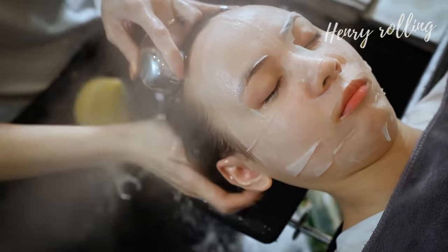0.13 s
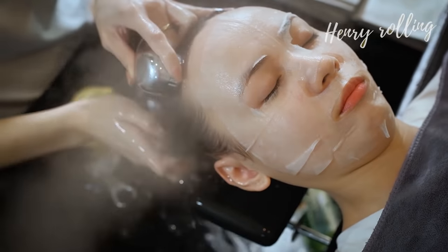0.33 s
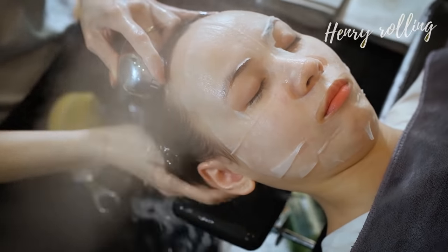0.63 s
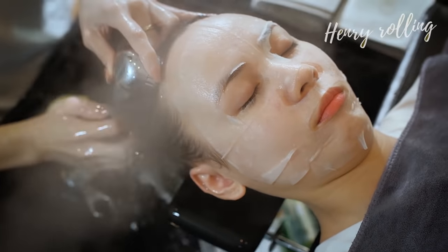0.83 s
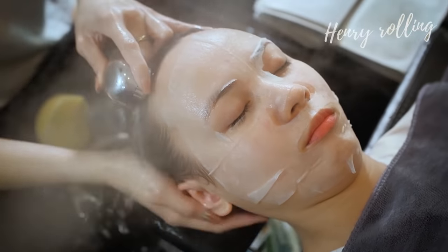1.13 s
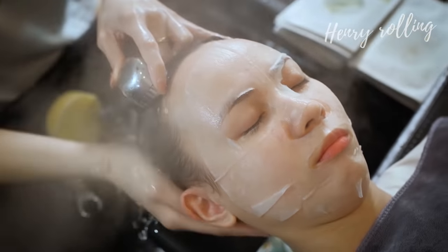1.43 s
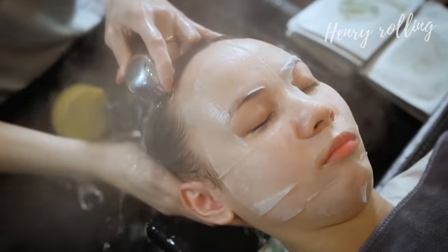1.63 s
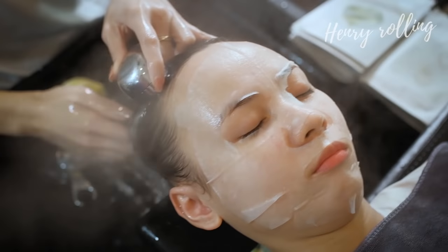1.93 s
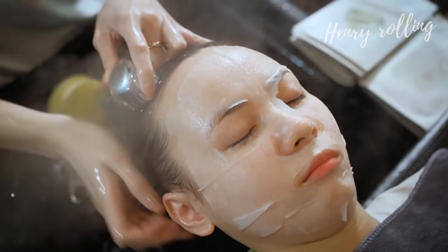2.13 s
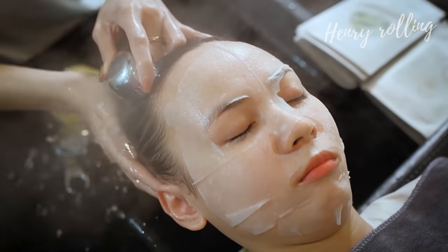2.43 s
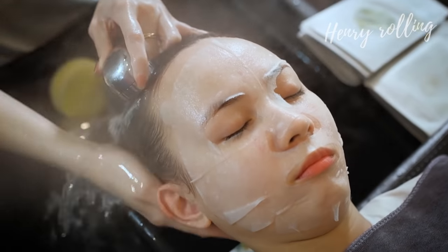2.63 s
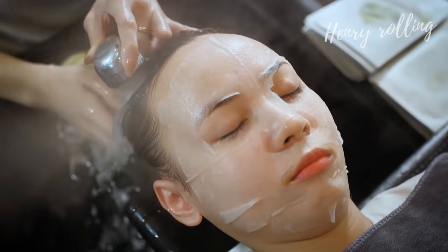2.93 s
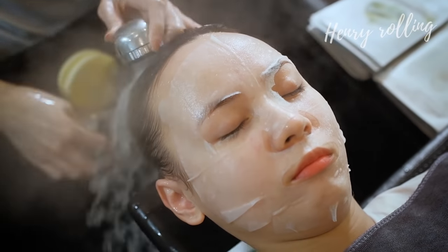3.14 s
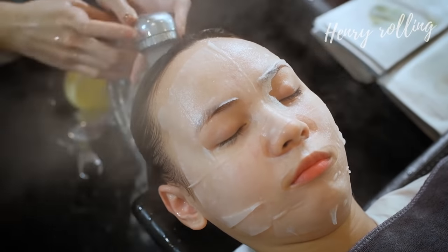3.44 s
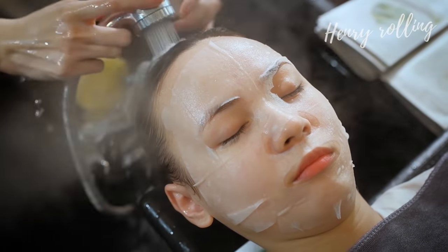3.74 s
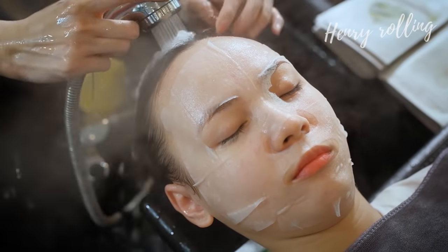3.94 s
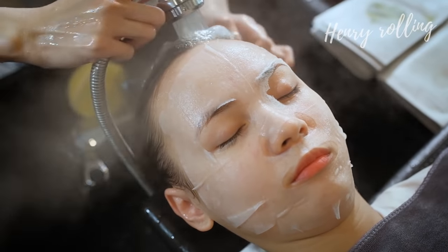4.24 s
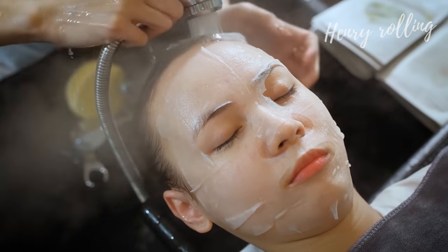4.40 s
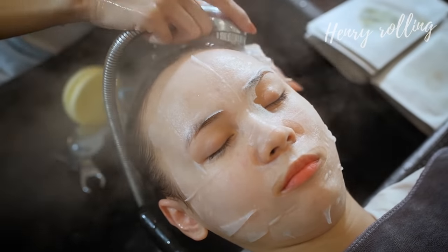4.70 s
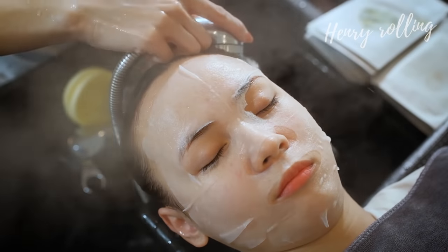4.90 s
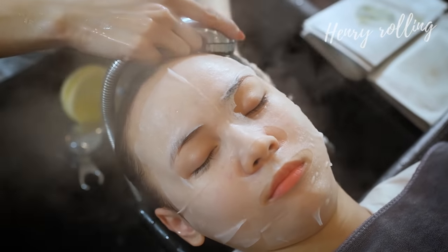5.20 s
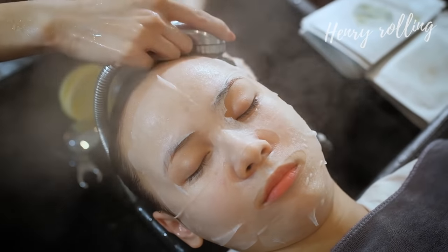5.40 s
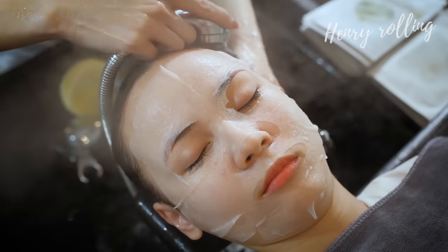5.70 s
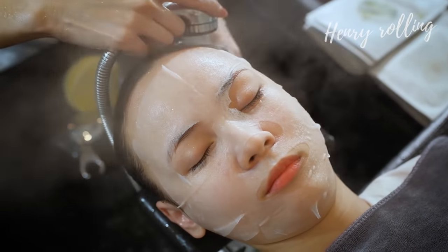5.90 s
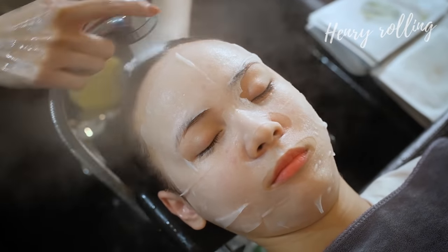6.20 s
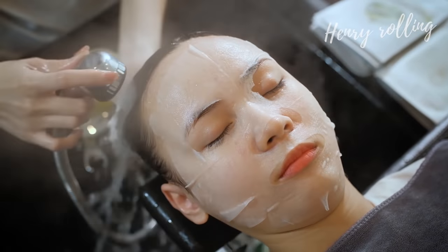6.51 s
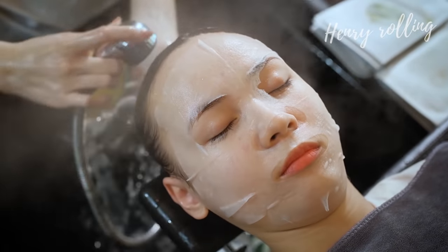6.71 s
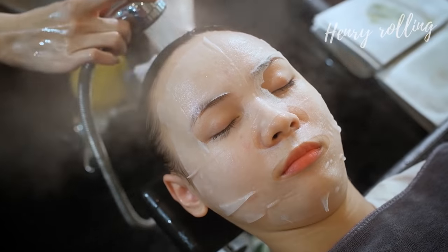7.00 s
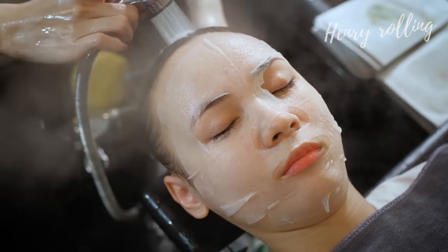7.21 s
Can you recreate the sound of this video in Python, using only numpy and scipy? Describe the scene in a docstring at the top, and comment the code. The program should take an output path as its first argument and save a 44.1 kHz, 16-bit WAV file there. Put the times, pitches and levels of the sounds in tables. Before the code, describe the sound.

Close hair rinsing at a salon basin: run-off drumming, hand splashes, big drops and gurgles, then strong surging shower spray.

```python
"""The jets of a hand shower hiss on hair and skin as shaped noise, louder as the head lifts away.
Below them running water excites the resonances of a hollow ceramic basin: the bowl drums, the hollow hums.
Loose water sloshes as swells of noise; drops patter as noise bursts and damped bubble tones.
Air trapped under a cupped hand gurgles as rough tones of rising pitch. A two-port microphone is near."""
import sys
import numpy as np
from scipy import signal
from scipy.fft import rfft, irfft, next_fast_len
from scipy.io import wavfile
from scipy.ndimage import uniform_filter1d, map_coordinates

SR = 44100
rng = np.random.default_rng(int(sys.argv[2]) if len(sys.argv) > 2 else 0)


def linear_from_db(decibels):
    """Turn decibels (scalar or array-like) into linear amplitude factors; 0 gives 1."""
    return 10 ** (np.asarray(decibels, float) / 20)


def store_pcm(level_fs):
    """Save levels as 16-bit WAV."""
    pcm = np.round(np.clip(level_fs, -1, 1) * 32767).astype(np.int16)
    wavfile.write(sys.argv[1], SR, np.atleast_2d(pcm).T)


N = 324135  # samples in the scene


def unit(x):
    """Normalization: x scaled to rms 1."""
    return x / np.sqrt(np.mean(x ** 2) + 1e-20)


def along(points, hz):
    """Interpolation of (Hz, value) points on a logarithmic frequency axis."""
    f, value = np.transpose(points)
    return np.interp(np.log(hz + 1), np.log(f + 1), value)


def curves(rows):
    """Linear interpolation in time: one value per sample for each column after the seconds."""
    s, *columns = np.transpose(rows)
    return [np.interp(np.arange(N) / SR, s, column) for column in columns]


def wobble(rate):
    """Random modulation: a smooth curve through random knots, rate knots a second."""
    return map_coordinates(rng.standard_normal(N // 100), [np.arange(N) * rate / SR])


def swollen(steady_db, s, length, db, rise_s):
    """Addition of powers: a steady level plus swells that rise quickly and die away over their length."""
    t = np.arange(0, N + 64, 64) / SR
    since = np.clip(t - s[:, None], 0, None)
    shape = (1 - np.exp(-since / rise_s)) * np.exp(-(since / length[:, None]) ** 2)
    power = np.sum((linear_from_db(db)[:, None] * shape) ** 2, 0)
    swells = np.interp(np.arange(N) / SR, t, power)
    return 10 * np.log10(linear_from_db(steady_db) ** 2 + swells)


def filtered(x, response):
    """Linear filtering: the spectrum of x times a complex response of frequency."""
    m = next_fast_len(N + SR // 2)
    return irfft(rfft(x, m) * response(np.fft.rfftfreq(m, 1 / SR)), m)[..., :N]


def noise(patchy_db):
    """Turbulence: two unrelated white noises sharing patches of random gain in time and frequency."""
    z = signal.stft(rng.standard_normal((2, N)), nperseg=512)[2]
    field = uniform_filter1d(rng.standard_normal(z.shape[1:]), size=7, axis=0)
    field = uniform_filter1d(field, size=6, axis=1)
    return signal.istft(z * linear_from_db(patchy_db * unit(field)), nperseg=512)[1][:, :N]


def coloured(x, spectrum):
    """Spectral shaping: x filtered to a spectrum, at rms 1."""
    return unit(filtered(x, lambda hz: linear_from_db(along(spectrum, hz))))


def resonant(x, modes, between_db):
    """Modal resonance: x through a set of resonances, with a little sound between them, at rms 1."""
    def response(f):
        peaks = sum(linear_from_db(db) ** 2 / (1 + (2 * (f - c) / w) ** 2) ** 2 for c, w, db in modes)
        span = (f > modes[0][0]) & (f < modes[-1][0])
        return np.sqrt(peaks + span * linear_from_db(between_db) ** 2)
    return unit(filtered(x, response))


def bubbles(s, hz, db, cycles, rise):
    """Bubble resonance: damped tones with a soft start, rising in pitch as each bubble nears the surface."""
    t = np.arange(SR // 60) / SR
    u = t * (hz / cycles)[:, None]
    tone = np.sin(2 * np.pi * hz[:, None] * t * (1 + rise * u)) * u * np.exp(1 - u)
    at = np.round(s * SR).astype(int)[:, None] + np.arange(len(t))
    return np.bincount(at.ravel(), (linear_from_db(db)[:, None] * tone).ravel(), N + SR)[:N]


def bursts(s, db, life_s):
    """Impact noise: puffs of white noise with a quick rise and an exponential fall."""
    u = np.arange(SR // 60) / SR / life_s[:, None]
    at = np.round(s * SR).astype(int)[:, None] + np.arange(u.shape[1])
    shape = np.bincount(at.ravel(), (linear_from_db(db)[:, None] * u * np.exp(1 - u)).ravel(), N + SR)[:N]
    return shape * rng.standard_normal(N)


# Run-off into the bowl, less once the head moves over the crown.
# Each row: time in seconds, drumming level in dB.
RUNOFF_LEVEL = [(0, -38), (1.0, -35), (2.2, -35), (3.2, -33), (4.2, -35), (5.9, -36.5), (6.7, -34.5),
                (7.35, -37.5)]
# Lumps of run-off thumping the bowl. Each row: start in seconds, fall in seconds, level before shaping in dB.
THUMP_SWELLS = [(0.13, 0.25, -30.5), (0.596, 0.09, -25), (0.803, 0.083, -28.5), (1.12, 0.12, -32),
                (1.975, 0.38, -32.5), (2.6, 0.088, -33), (2.844, .1, -28), (3.28, 0.1, -24),
                (3.597, 0.075, -26.5), (3.953, .1, -29.5), (6.566, 0.065, -25.5)]


def drumming():
    """Impact excitation: level in dB of the run-off on the bowl, thumps included."""
    return swollen(curves(RUNOFF_LEVEL)[0], *np.transpose(THUMP_SWELLS), rise_s=0.02)


# Resonances of the bowl. Each row: frequency in Hz, 6 dB width in Hz, relative level in dB.
BOWL_MODES = [(194.7, 16, -14.5), (248.7, 11, -0.5), (288, 43, 2), (349.8, 26, 1), (418.4, 68, -4.5)]


def bowl():
    """Modal resonance: lumpy run-off drives the modes of the bowl."""
    level_db = drumming() + 0.54 * wobble(8.3)
    return linear_from_db(level_db) * resonant(noise(patchy_db=1.5), BOWL_MODES, between_db=-15)


# Spectrum of the rumble. Each row: frequency in Hz, relative density in dB per Hz.
RUMBLE_SPECTRUM = [(20, -3), (70, -2), (120, 10), (150, -5), (185, 22), (205, -24)]


def rumble():
    """Amplitude modulation: the level of a faint bass noise follows the drumming."""
    level_db = -75 + 0.92 * (drumming() + 34) + 2.4 * wobble(8.6)
    return linear_from_db(level_db) * coloured(noise(patchy_db=3), RUMBLE_SPECTRUM)


# The stream in the hollow. Each row: time in seconds, hum level in dB.
HUM_LEVEL = [(0, -27.5), (2.4, -27.5), (3.6, -26), (4.9, -29), (6.2, -26.5), (7.35, -26.5)]
# Resonances of air in basin and drain. Each row: frequency in Hz, 6 dB width in Hz, relative level in dB.
HOLLOW_MODES = [(515, 26, -17.5), (587.6, 31, -9), (640.3, 42.4, -9.5), (900, 25, -6), (967, 66.4, 1.5),
                (1030, 29, 2), (1102, 109, -3), (1540, 110, -7.5), (1658, 51, -6), (1758, 110, -10),
                (2132, 190, -17.5), (2400, 200, -21)]


def hollow():
    """Cavity resonance: the steady stream makes the air in basin and drain hum."""
    level_db = curves(HUM_LEVEL)[0] + 0.6 * wobble(4.6)
    return linear_from_db(level_db) * resonant(noise(patchy_db=1.0), HOLLOW_MODES, between_db=-49.0)


# Swells of low and of high sloshing.
# Each row: start in seconds, fall in seconds, level before shaping in dB.
LOW_SLOSH_SWELLS = [(0.0, 0.096, -34), (0.2, 0.38, -36.5), (0.63, 0.077, -33), (0.8, .35, -44),
                    (1.42, .08, -40), (1.606, 0.24, -39.5), (2.17, 0.54, -45), (2.5, 0.82, -47.5),
                    (3.245, 0.075, -28), (3.5, 0.09, -30), (3.697, .25, -39), (4.0, .12, -31.5),
                    (4.25, .2, -37), (4.542, 0.084, -34), (5.058, 0.084, -36), (5.5, .15, -35),
                    (6.017, 0.18, -36), (6.447, 0.44, -39.5), (7.303, .1, -31)]
HIGH_SLOSH_SWELLS = [(0.2, 0.37, -43), (0.78, 0.19, -32), (1.15, .15, -39), (1.6, .3, -48), (2.1, .1, -34),
                     (2.48, 0.082, -32), (3.7, .3, -38), (4.0, 0.5, -28), (4.7, 0.54, -31.5),
                     (5.5, 0.6, -39), (6.3, 0.34, -37), (6.85, 0.13, -23), (6.98, 0.14, -24.5),
                     (7.26, .15, -33)]
# Spectra of low and of high sloshing. Each row: frequency in Hz, relative density in dB per Hz.
LOW_SLOSH_SPECTRUM = [(420, -50), (480, 1), (700, 7), (860, 8), (950, -44)]
HIGH_SLOSH_SPECTRUM = [(1100, -45), (1250, -6), (1450, 4), (2000, -1.5), (2600, -6.5), (2750, -46)]


def slosh():
    """Turbulent motion: loose water sloshes in the bowl in two bands, swelling over a quiet level."""
    rise_s = 0.037
    low_db = swollen(-66, *np.transpose(LOW_SLOSH_SWELLS), rise_s)
    high_db = swollen(-45.5, *np.transpose(HIGH_SLOSH_SWELLS), rise_s)
    low = linear_from_db(low_db) * coloured(noise(patchy_db=4.0), LOW_SLOSH_SPECTRUM)
    high = linear_from_db(high_db) * coloured(noise(patchy_db=1.5), HIGH_SLOSH_SPECTRUM)
    return low + high


# The steady jets, opening as the head lifts.
# Each row: time in seconds, hiss in dB, slap on skin in dB over hiss, mist in dB over hiss.
SPRAY_LEVELS = [(0, -44.5, -25, -18), (0.9, -39, -28, -20), (1.55, -34, -18, -22.5), (2.0, -41.5, -21, -18),
                (2.7, -38, -4, -25), (2.87, -30, 2, -24), (3.3, -23, -5.5, -15), (3.7, -23, -7, -15),
                (3.9, -20.5, -2.5, -13), (4.1, -21.5, -2.5, -17.5), (4.5, -16.5, -7.5, -18.5),
                (4.75, -20, -4, -24), (4.9, -23.5, -11, -24.5), (5.23, -18.5, -9.5, -23),
                (5.4, -26, -1, -25), (5.65, -21, -6.5, -22), (5.87, -16.5, -10.5, -20.5),
                (6.05, -18, -8, -18), (6.3, -23.5, -4.5, -23.5), (6.9, -26.5, -4.5, -21),
                (7.02, -21, -10, -21), (7.12, -22, -12.5, -21), (7.25, -17, -5.5, -18),
                (7.35, -18, -9, -18)]
# The hand passing through the jets. Each row: centre in seconds, 1/e half-length in seconds, depth in dB.
HAND_DIPS = [(4.78, .015, 4), (4.86, 0.049, 4.5), (5.049, 0.032, 4), (5.145, 0.053, 3), (5.477, 0.094, 7)]
# Water scooped or thrown off by the hand. Each row: start in seconds, fall in seconds,
# hiss before shaping in dB, slap in dB over hiss, mist in dB over hiss.
SPLASH_SWELLS = [(0.0, 0.058, -32, -3, -19), (0.16, 0.085, -36, 1.5, -14), (0.407, 0.13, -35.5, 0, -30),
                 (0.613, 0.084, -36.5, 2.5, -27), (0.749, 0.16, -35, 3, -11.5), (1.173, .09, -30, 1.5, -27),
                 (1.3, 0.072, -32.5, -1.5, -24), (1.51, 0.23, -32.5, -5, -27), (2.01, 0.091, -35, -28, -18),
                 (2.138, 0.076, -31.5, 0, -15), (2.23, 0.084, -32.5, -6, -16),
                 (2.326, 0.092, -37, 0.5, -23), (2.475, 0.086, -33.5, -1, -28),
                 (3.722, 0.11, -16.5, -5, -24), (3.75, .015, -24, 10, -20), (4.79, .015, -26, -18, -10),
                 (5.192, .02, -22, -10, -22), (5.38, .02, -26, 2, -18), (5.78, 0.1, -25.5, 3, -25),
                 (5.5, 0.11, -16.5, -7.5, -19), (6.5, 0.093, -28, 3.5, -25), (6.59, 0.024, -22, -2, -24)]


def spray():
    """Attenuation and addition of powers: jet levels dip under the hand and gain the splashes."""
    hiss_db, slap_db, mist_db = curves(SPRAY_LEVELS)
    t = np.arange(N) / SR
    dip_db = sum(depth_db * np.exp(-((t - s) / length) ** 2) for s, length, depth_db in HAND_DIPS)
    s, length, db, slap, mist = np.transpose(SPLASH_SWELLS)
    rise_s = 0.021
    hiss_level = swollen(hiss_db - dip_db, s, length, db, rise_s)
    slap_level = swollen(hiss_db + slap_db - dip_db, s, length, db + slap, rise_s)
    mist_level = swollen(hiss_db + mist_db - 0.84 * dip_db, s, length, db + mist, rise_s)
    return hiss_level, slap_level, mist_level


# Each row: frequency in Hz, relative density in dB per Hz.
HISS_SPECTRUM = [(2700, -120), (2950, -27), (3400, -11), (4200, 0), (5500, -0.5), (7000, -2), (8500, -12),
                 (9600, -17), (9800, -62)]
SLAP_SPECTRUM = [(900, -72), (1300, -8), (1900, -2), (2600, 3), (3300, 2), (4000, -1), (5000, -54)]
MIST_SPECTRUM = [(7000, -40), (9000, -1), (10000, -4.5), (12500, -7.5), (14500, -11.5), (15800, -19)]


def jets(hiss_db, slap_db, mist_db):
    """Jet noise: fine jets break on hair, splutter in all colours together and spit when choked."""
    # Under a hiss of -21.5 dB the spitting deepens with each dB lost
    choked = np.clip(0.24 * (-21.5 - hiss_db), 0, 1.5)
    splutter = 0.66 * wobble(12) + 0.75 * wobble(45)
    surge, spit = choked * wobble(30), choked * wobble(140)
    hiss_level = hiss_db + 0.62 * splutter + 0.54 * surge + 1.4 * spit
    hiss = linear_from_db(hiss_level) * coloured(noise(patchy_db=2.45), HISS_SPECTRUM)
    skin = noise(patchy_db=1.5)
    # The slap also rings the upper hollow; time reversal makes its noise differ from the slap's
    ringing = linear_from_db(-10.5) * resonant(skin[:, ::-1], HOLLOW_MODES[7:10], between_db=-30)
    slap_level = slap_db + 0.42 * splutter + 0.4 * surge
    slap = linear_from_db(slap_level) * (coloured(skin, SLAP_SPECTRUM) + ringing)
    mist_level = mist_db + 0.9 * splutter + 0.3 * surge + 2.2 * spit
    mist = linear_from_db(mist_level) * coloured(noise(patchy_db=1.5), MIST_SPECTRUM)
    return hiss + slap + mist


def patter(hiss_db, count=4200):
    """Random impacts: small drops from the hair tick, harder under stronger spray; a few are much bigger."""
    draw = rng.random((count, 5))
    s = draw[:, 0] * N / SR
    rare = -np.log(1 - 0.99 * draw[:, 1])  # exponential spread of force
    force_db = 0.43 * (hiss_db[(s * SR).astype(int)] + 34.5) + 4.14 * rare
    crack = bursts(s, force_db - 40.5, 0.00039 + 0.00097 * draw[:, 4])
    pitch_hz = 3400 * linear_from_db(6.73 * draw[:, 2])
    cycles = 1.3 + 4 * draw[:, 3] ** 3
    return crack + bubbles(s, pitch_hz, force_db - 42.5, cycles, rise=0.009)


# Single big drops. Each row: start in seconds, relative level in dB, pitch in Hz.
BIG_DROPS = [(0.138, -31, 4300), (0.168, -20, 4870), (0.1916, -2.5, 3890), (0.251, -19, 4300),
             (0.29, -16, 4280), (0.3053, -15.5, 5600), (0.408, -21, 6450), (0.4364, -14.5, 6430),
             (0.609, -11, 6180), (0.773, -11.5, 4500), (0.828, -9.5, 4880), (0.864, -14.5, 4700),
             (0.928, -13.5, 4870), (1.011, -13.5, 7840), (1.074, -15, 4050), (1.1237, -20, 4450),
             (1.1822, -12, 4500), (1.3197, -12, 3860), (1.3896, -17, 5840), (1.49, -9.5, 4540),
             (1.5725, -15, 3800), (1.647, -16, 5440), (1.8194, -11.5, 5000), (1.889, -9, 5370),
             (2.0407, -29, 4200), (2.081, -17, 7600), (2.111, -16.5, 7750), (2.14, -22, 5500),
             (2.279, -20.5, 4800), (2.3271, -11, 3950), (2.3412, -14.5, 4800), (2.351, -11, 3950),
             (2.491, -16, 6200), (2.5438, -16, 4270), (3.184, -9, 4850), (3.3004, -6.5, 4430),
             (3.4018, -17, 4870), (3.727, -3.5, 3100), (4.595, -5.5, 4950), (5.203, -12, 5200),
             (6.499, -6.5, 4000), (6.6008, -3.5, 4520), (6.6453, -5.5, 3730), (6.8417, -11, 4450)]


def drops():
    """Impact and bubble resonance: a big drop cracks, rings and throws a cluster of smaller ones after it."""
    s, db, hz = np.transpose(BIG_DROPS)
    sound = bubbles(s, hz, db - 3.5, cycles=3.5, rise=0.0076)
    sound += bursts(s, db - 5, np.full(len(s), 0.0013))
    for later in rng.random((4, len(s), 2)):
        spread_hz = np.clip(hz * linear_from_db(9.65 * (later[:, 1] - 0.53)), 3300, 8500)
        start = s + 0.016 * later[:, 0] ** 2
        sound += bubbles(start, spread_hz, db - 8 - 9 * later[:, 0], cycles=5, rise=0.008)
    return sound


# Each row: frequency in Hz, gain in dB.
SPATTER_COLOUR = [(2750, -70), (3000, -12), (3500, -6), (4500, 1.5), (6500, -0.5), (8500, -12), (9600, -19),
                  (9900, -33), (15800, -39)]


def spatter(hiss_db):
    """Spectral shaping: big drops and fine patter share one colour."""
    return filtered(drops() + patter(hiss_db), lambda hz: linear_from_db(along(SPATTER_COLOUR, hz)))


# Air trapped under the cupped hand.
# Each row: start in seconds, length in seconds, start pitch in Hz, end pitch in Hz, level in dB.
AIR_POCKETS = [(0.455, 0.061, 403, 492, -37), (0.616, 0.092, 662, 810, -30),
               (1.179, 0.088, 628, 659, -35.5), (2.497, 0.04, 547, 647, -30.5), (3.301, .1, 428, 523, -34),
               (1.513, 0.065, 490, 586, -34.5), (3.752, 0.017, 1910, 2280, -24),
               (4.096, 0.2, 1562, 1700, -37), (4.562, 0.085, 1518, 1584, -30.5),
               (5.754, .12, 2077, 2400, -30.5), (6.12, 0.13, 810, 886, -35), (6.832, 0.13, 752, 943, -28.5),
               (6.89, 0.11, 1400, 1646, -29), (6.995, 0.15, 1504, 1730, -30)]


def gurgles():
    """Cavity resonance: a pocket of air rings roughly, rising in pitch as water fills it."""
    sound = np.zeros(N + SR)
    for s, length, from_hz, to_hz, db in AIR_POCKETS:
        u = np.linspace(0, 1, round(length * SR))
        turn = np.exp(2j * np.pi * np.cumsum(from_hz + (to_hz - from_hz) * u) / SR)
        # Smoothing over 4.2 end-pitch cycles leaves slow roughness in amplitude and phase
        rough = uniform_filter1d(rng.standard_normal((2, SR)), round(4.2 * SR / to_hz))[:, :len(u)]
        tone = unit(((rough[0] + 1j * rough[1]) * turn).real)
        envelope = np.abs(np.sin(np.pi * u)) ** 0.42
        sound[round(s * SR):][:len(u)] += linear_from_db(db) * envelope * tone
    return sound[:N]


# Decay of the room. Each row: frequency in Hz, time to fall by 60 dB in seconds.
ROOM_DECAY = [(300, 0.27), (3000, 0.35), (10000, 0.029)]


def room(x):
    """Reverberation: x convolved with decaying noise, each frequency dying at its own speed."""
    hz, t, z = signal.stft(rng.standard_normal((2, SR // 3)), SR, nperseg=256)
    decay = linear_from_db(-60 * t / along(ROOM_DECAY, hz)[:, None])
    tail = signal.istft(z * decay, SR, nperseg=256)[1]
    return signal.fftconvolve(x[None], tail / np.linalg.norm(tail[0]), axes=1)[:, :N]


def band_gap(x, slap_db):
    """Band rejection: like a noise suppressor, it empties a band near 2.9 kHz, and more above, at low slap_db."""
    def band(centre_hz, width_hz):
        return filtered(x, lambda f: 1 / (1 + (2 * (f - centre_hz) / width_hz) ** 4))
    depth = np.clip((-33 - slap_db) / 6, 0, 1)
    upper_depth = 0.33 * np.clip((-50 - slap_db) / 8, 0, 1)
    return x - depth * band(2860, 260) - upper_depth * band(3200, 400)


# Likeness of the two ports. Each row: frequency in Hz, coherence from 0 to 1.
PORT_LIKENESS = [(60, 0.93), (150, 1), (380, 0.99), (950, 0.98), (2380, 0.98), (5980, 1), (15000, 0.57)]
# Level balance of the ports. Each row: frequency in Hz, left over right in dB.
PORT_BALANCE = [(60, -0.5), (240, 0.22), (950, 0.24), (3770, -0.91), (15000, -1.5)]
# Phase between the ports. Each row: frequency in Hz, lead of the left in radians.
PORT_LEAD = [(1500, -0.062), (3500, -0.59), (8000, -0.54), (14000, -0.5)]


def two_ports(both, apart):
    """Coherence: the ports share one signal, differ by another, and part in level and phase."""
    def angle(hz):
        return np.arccos(np.clip(along(PORT_LIKENESS, hz), 0, 1)) / 2

    def tilt(hz):
        return linear_from_db(along(PORT_BALANCE, hz) / 2) * np.exp(0.5j * along(PORT_LEAD, hz))
    mid = filtered(both, lambda hz: np.cos(angle(hz)))
    side = filtered(apart, lambda hz: np.sin(angle(hz)))
    return filtered(np.array([mid + side, mid - side]), lambda hz: np.array([tilt(hz), 1 / tilt(hz)]))


def scene():
    """Superposition: row 0 of the sum reaches both ports alike, row 1 is what differs between them."""
    hiss_db, slap_db, mist_db = spray()
    basin = bowl() + hollow() + slosh()
    near = spatter(hiss_db) + gurgles()
    water = basin + jets(hiss_db, slap_db, mist_db) + near * [[1], [0.3]] + linear_from_db(-8.0) * room(near)
    both, apart = band_gap(water, slap_db)
    return two_ports(both, apart)


def top_cut(x):
    """Nothing passes above the cut-off."""
    return signal.sosfilt(signal.butter(12, 15760, fs=SR, output="sos"), x)


def record(dry):
    """High-pass filtering: the microphone cuts the bass steeply; faint bass noise is added after the cut."""
    cut = filtered(dry, lambda hz: 1 / (1 + (160 / (hz + 1)) ** 8))
    both, apart = rumble()
    return top_cut(cut + both + apart * [[0.25], [-0.25]])


dry = scene()
out = record(dry)
store_pcm(out)
```